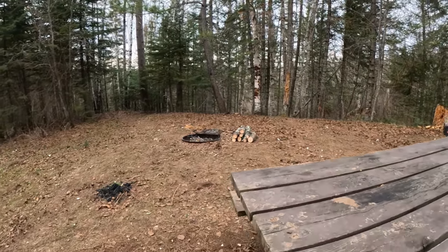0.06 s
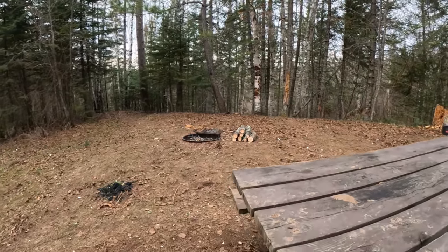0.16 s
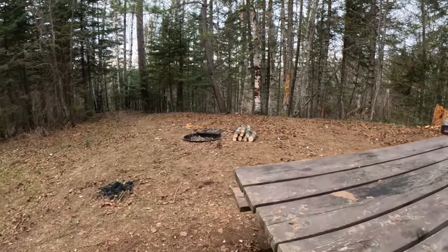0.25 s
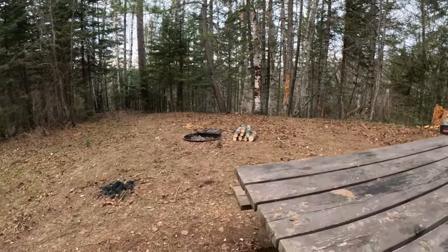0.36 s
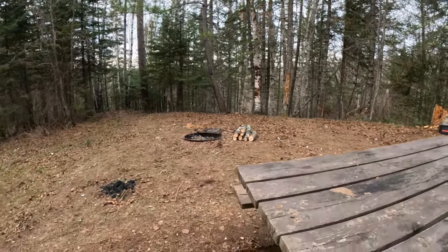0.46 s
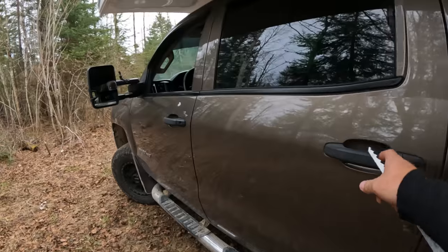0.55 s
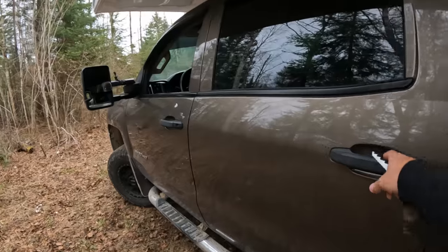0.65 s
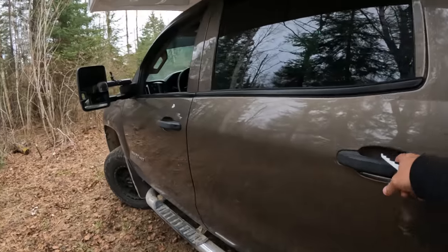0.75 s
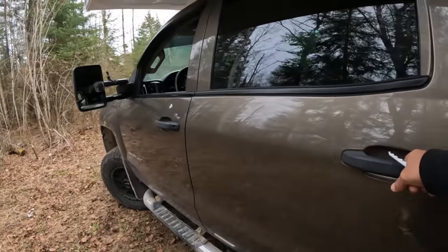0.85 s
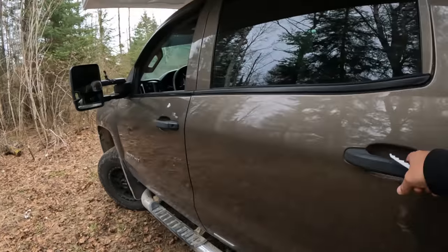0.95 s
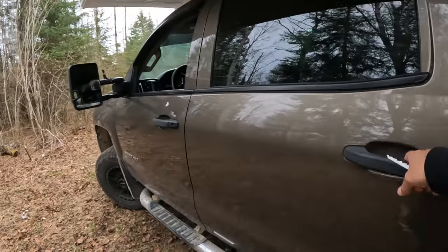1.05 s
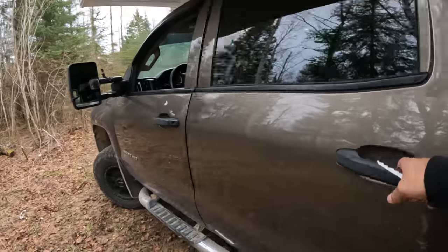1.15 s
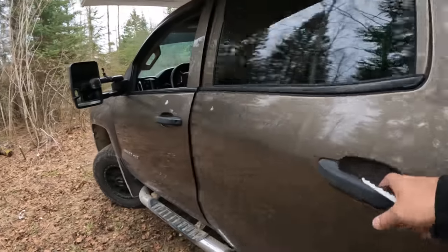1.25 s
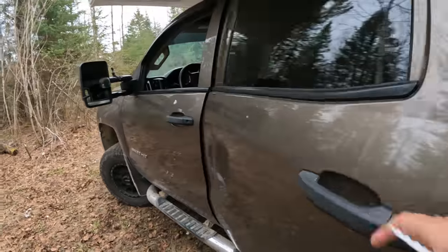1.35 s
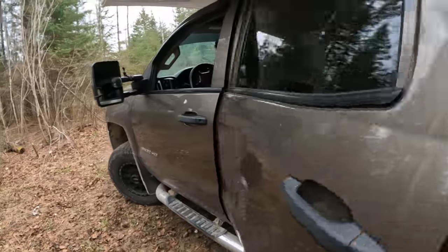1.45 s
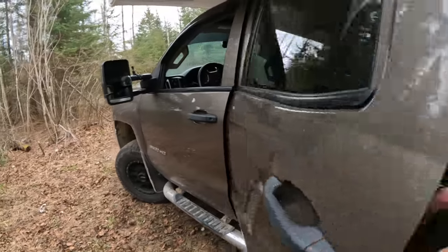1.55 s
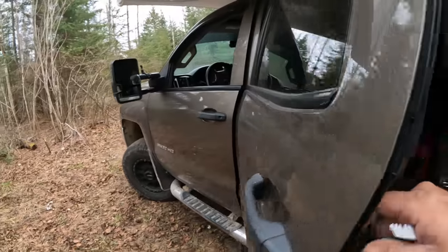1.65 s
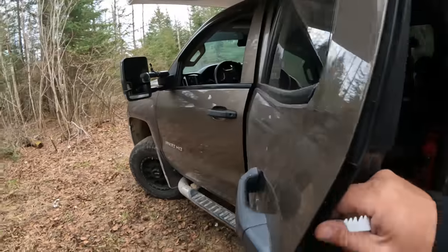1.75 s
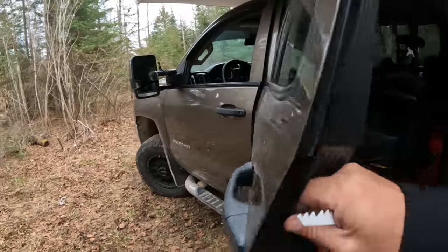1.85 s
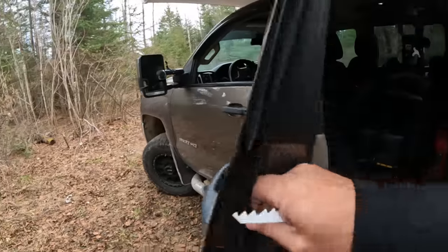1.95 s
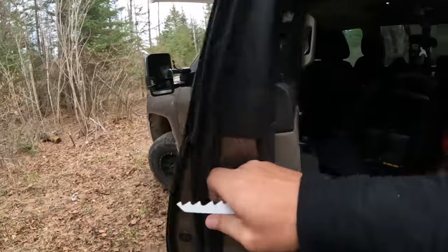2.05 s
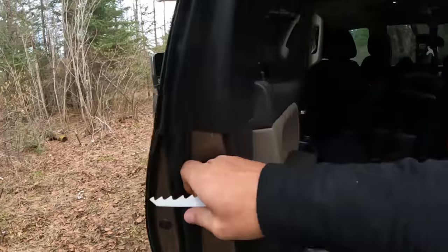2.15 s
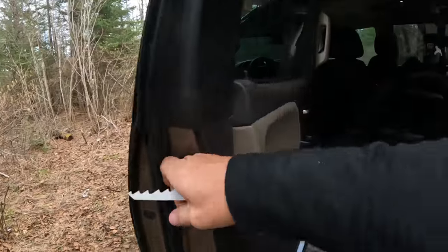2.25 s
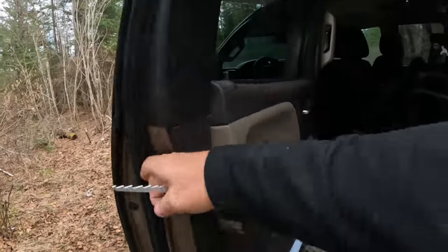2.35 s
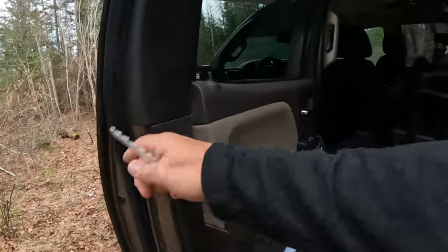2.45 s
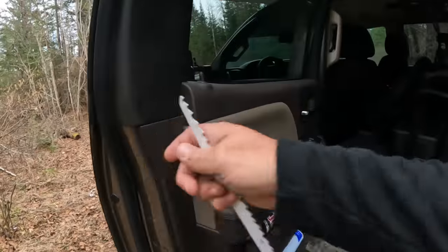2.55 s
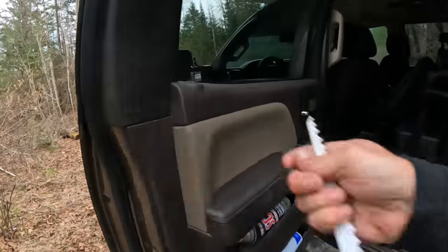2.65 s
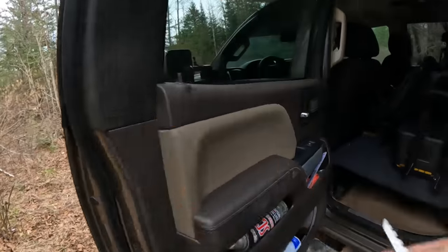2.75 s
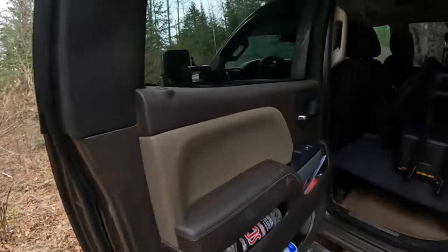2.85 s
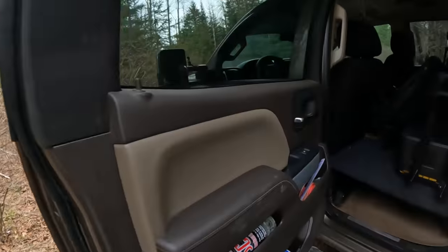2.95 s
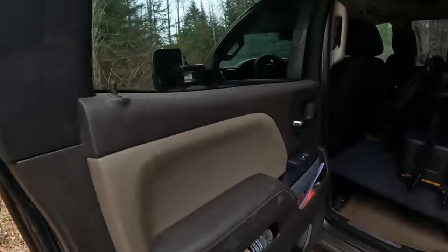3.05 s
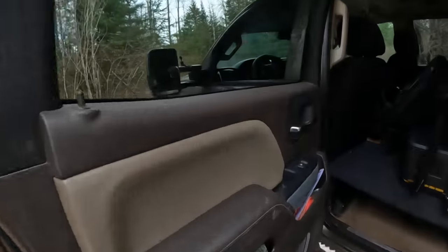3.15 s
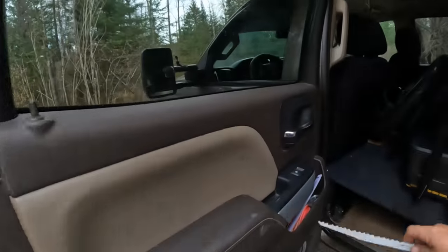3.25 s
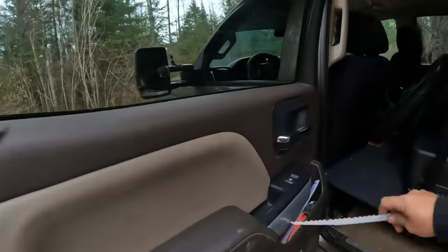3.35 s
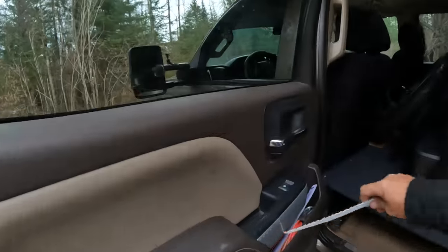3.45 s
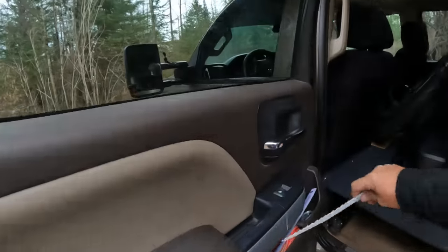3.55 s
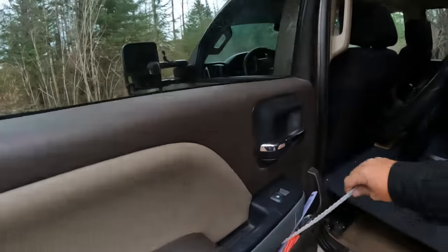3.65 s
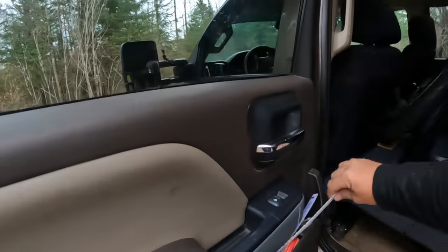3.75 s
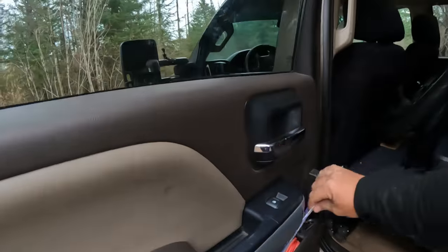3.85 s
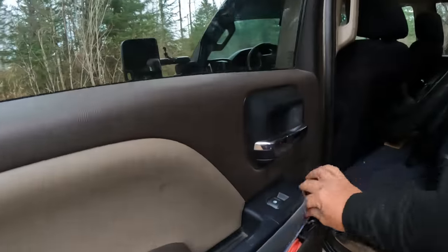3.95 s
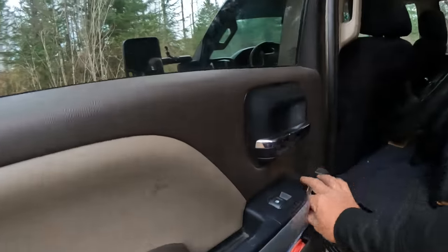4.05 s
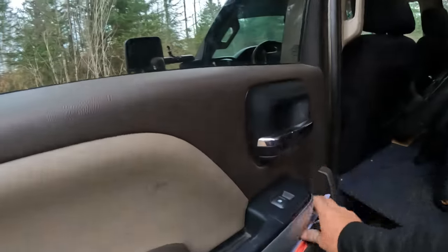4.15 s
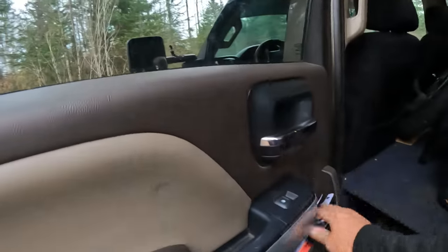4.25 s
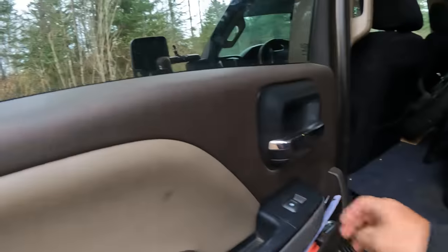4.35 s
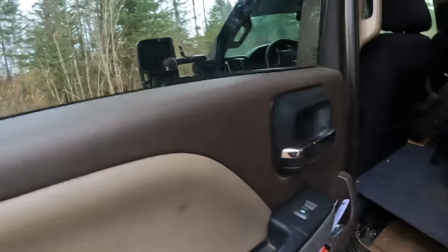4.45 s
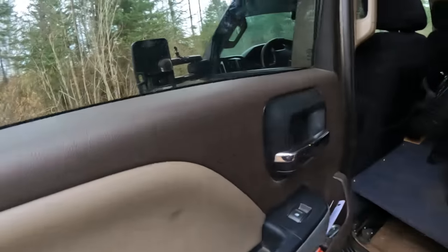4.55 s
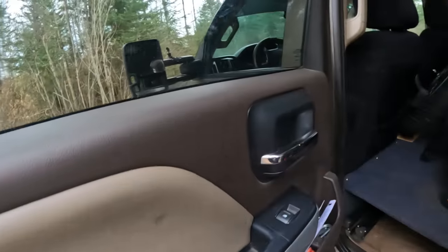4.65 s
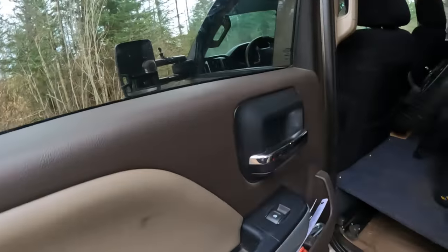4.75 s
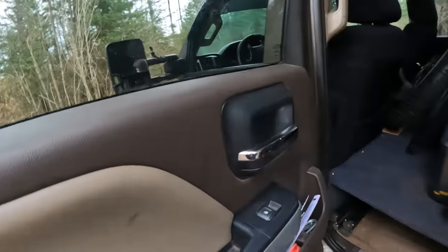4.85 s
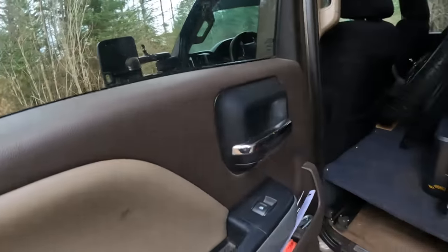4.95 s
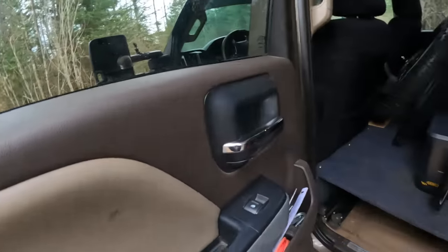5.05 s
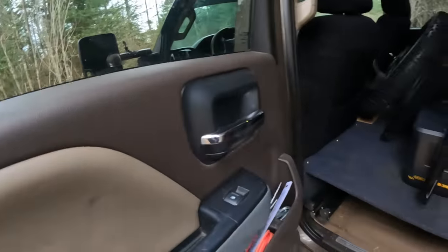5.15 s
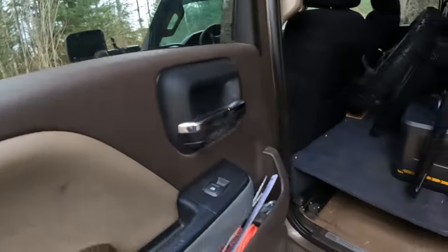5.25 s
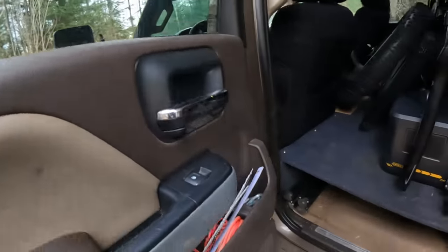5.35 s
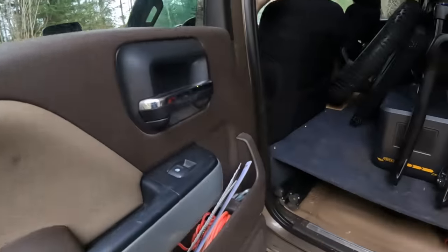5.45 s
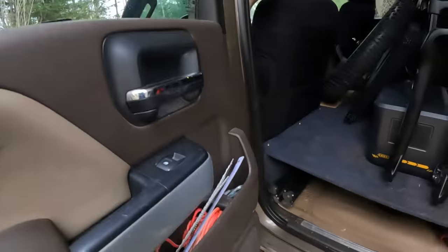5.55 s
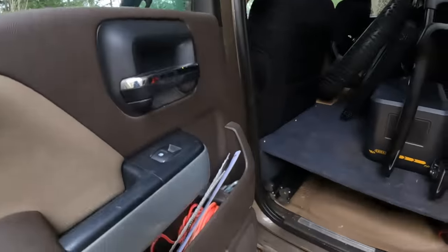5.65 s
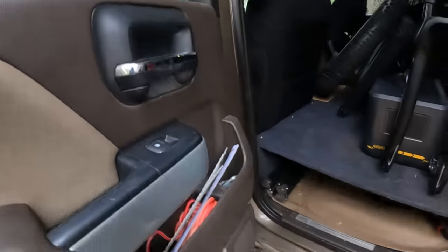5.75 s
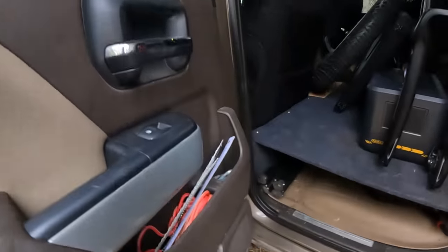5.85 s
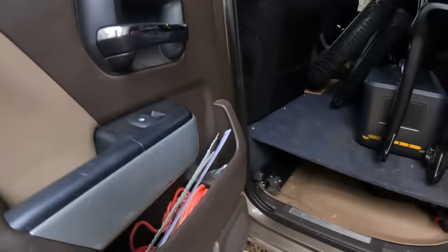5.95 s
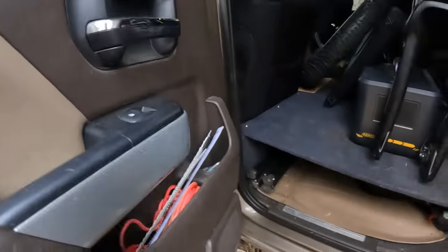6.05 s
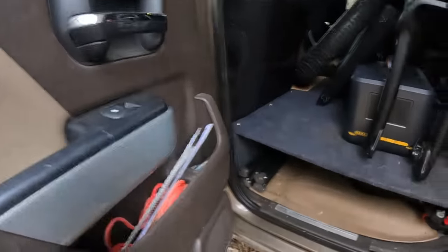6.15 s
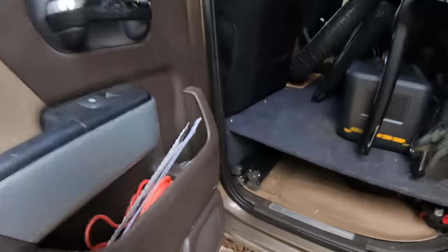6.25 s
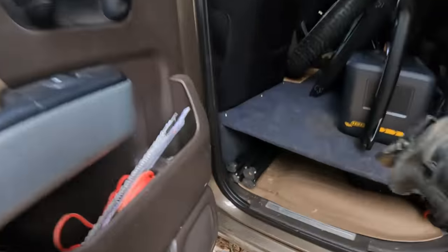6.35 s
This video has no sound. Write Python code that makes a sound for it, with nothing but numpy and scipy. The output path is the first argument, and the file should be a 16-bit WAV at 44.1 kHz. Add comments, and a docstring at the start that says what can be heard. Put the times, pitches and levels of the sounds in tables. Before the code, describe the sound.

At a quiet woodland spot a truck door handle clicks, the latch clunks open loudly, then a saw blade clinks and rattles into a plastic door pocket.

```python
"""At a quiet forest campsite a pickup's rear door is opened: the handle clicks, the latch lets go with a clunk.
A saw blade slides through the fingers, clinks and rattles down into the plastic door pocket.
Then a sleeve rustles close by and a hand knocks and rubs on the camera.
Door, pocket and housing are struck resonators, the blade is a sum of modes set off by contact or friction,
and rustle, breeze and rumble are shaped noise."""
import sys
import numpy as np
from scipy import signal
from scipy.fft import rfft, irfft, next_fast_len
from scipy.io import wavfile
from scipy.ndimage import uniform_filter1d, map_coordinates

SR = 44100
rng = np.random.default_rng(int(sys.argv[2]) if len(sys.argv) > 2 else 0)


def wav_out(sig):
    """Save sig, one row per channel (or a flat mono array), as 16-bit PCM at SR to the path in sys.argv[1]."""
    wavfile.write(sys.argv[1], SR, np.round(np.clip(np.atleast_2d(sig).T, -1, 1) * 32767).astype(np.int16))


N = 282240

# Wind in the trees. Each row: time in seconds, level in dB.
BREEZE_LEVEL = [(0, -59), (.9, -63), (1.4, -55.5), (2.7, -65), (4.5, -63.5), (5.3, -53.5), (6.4, -64)]
# Colour of that wind. Each row: frequency in Hz, relative density in dB per Hz.
TREE_SPECTRUM = [(30, -24.5), (70, -9), (180, -3), (380, 1), (750, -2.5), (1400, -7.5), (2800, -16),
                 (5000, -22.5), (7500, -36), (10000, -34), (14000, -27)]
# Swells of low rumble: the first sets in abruptly, the later ones come from sways of the carried camera.
# Each row: time of the peak in seconds, level in dB, rise in seconds, fall in seconds.
RUMBLE_SWELLS = [(.56, -51.5, 0.0087, 0.45), (1.1, -41, 0.1, 0.37), (1.41, -42.5, 0.056, 0.3),
                 (2.1, -58.5, 1.4, 1.3), (2.92, -47, 0.21, 0.53), (3.6, -56.5, 1.1, 1.0),
                 (4.8, -47.5, 0.15, 1.67), (5.68, -44, 0.11, 0.16)]
# Colour of the rumble. Each row: frequency in Hz, relative density in dB per Hz.
RUMBLE_SPECTRUM = [(15, 6), (35, -12.5), (70, -13.5), (150, -19.5), (400, -54)]
RUMBLE_REST_DB = -69

# Swells of soft rustle: the first sets in abruptly, the later ones are arm movements that brush the sleeve.
# Each row: time of the peak in seconds, level in dB, rise in seconds, fall in seconds.
RUSTLE_SWELLS = [(.56, -56, 0.005, 0.34), (1.35, -61, 0.62, 0.25), (1.74, -58, 0.21, 0.14),
                 (2.98, -59, 0.99, 1), (4.54, -62, 0.24, 0.537), (4.767, -45, .009, 0.053),
                 (4.812, -42, 0.045, .06), (4.87, -48.5, 0.16, 0.88), (5.15, -43, 0.12, 0.15),
                 (5.295, -44.5, 0.07, 0.043), (5.335, -40.5, 0.12, 0.043), (5.455, -45.5, 0.048, 0.047),
                 (5.57, -46, 0.095, 0.16), (5.73, -39, 0.068, 0.015), (5.87, -46.5, 0.02, 0.026),
                 (6.06, -43.5, 0.22, 0.17), (6.25, -58, 0.26, 1)]
# Colour of the rustle. Each row: frequency in Hz, relative density in dB per Hz.
CLOTH_SPECTRUM = [(150, -23.5), (400, -7.5), (900, -3.5), (2200, -0.5), (3600, -2), (5500, -6),
                  (7500, -17.5), (10500, -11), (14000, -8), (16000, -15.5)]
RUSTLE_REST_DB = -70  # the cloth never lies quite still
SWELL_DB = 20  # change of level within one rise or fall time

# Blows on the door: the handle clicks and thuds (1.0 s), the latch lets go (1.4 s), then hand and blade
# tap the open door. Each row: start in seconds, level in dB, lowest and highest driven frequency in Hz.
DOOR_BLOWS = [(.848, -52.5, 3140, 5200), (0.9761, -29, 580, 1600), (.992, -38, 230, 330),
              (1.025, -40.5, 249, 600), (1.046, -34.5, 600, 2200), (1.070, -24, 54.5, 650),
              (1.079, -17.5, 232, 1100), (1.085, -27.5, 1200, 1900), (1.098, -23, 80, 610),
              (1.138, -36.5, 70, 600), (1.393, -6, 1400, 2900), (1.396, -9.5, 213, 500),
              (1.406, -18, 145, 800), (1.410, -16, 1420, 2000), (1.64, -36, 1160, 1260),
              (1.818, -34, 354, 1650), (1.871, -44, 400, 1400), (2.422, -38.5, 110.2, 1500),
              (2.4806, -39.5, 201, 950), (2.655, -49, 453, 900), (2.862, -46.5, 50.9, 152),
              (3.065, -39, 520, 1100), (3.439, -25, 100, 1300), (3.503, -41, 200, 2470),
              (3.526, -43, 1890, 4100), (3.912, -31.5, 317, 2780), (3.933, -35, 320, 2600),
              (3.952, -32.5, 310, 2630), (3.964, -30, 276, 2470)]
# Panel modes of the door. Each row: frequency in Hz, relative level in dB, undamped t60 in seconds.
DOOR_MODES = [(80, -7.5, 0.4), (148.5, 0.5, 0.2), (210.5, 3.5, .21), (266, 7.5, 0.12), (343, 5, 0.11),
              (493, -1, 0.07), (769.5, -1.5, 0.063), (1404, -1, 0.04), (1630, -6, 0.037),
              (1700, -2.5, 0.044), (2043, -4.5, 0.046), (2400, -16, 0.12), (3320, -6, 0.063)]
# Dense ring of trim and lock parts. Each row: frequency in Hz, relative density in dB per Hz,
# undamped t60 in seconds.
TRIM_RING = [(60, -2, 0.44), (204, -1.5, 0.22), (375, 8.5, 0.13), (820, 2.5, 0.11), (1100, -3.5, 0.038),
             (1645, -2, 0.026), (2206, -7, 0.08), (2650, -12, 0.023), (3380, -6.5, 0.05),
             (7000, -18.5, 0.094), (11050, -7, 0.043), (15000, -12, 0.027)]
LATCH_OPENS_S, SEAL_DAMPING_DB_PER_S = 1.3, 254  # until then the rubber seals damp the shut door
TICK_GROWS = 2.1  # dB that the tick gains on the ring for each dB of the blow

# The blade slides through the fingers, then its teeth run twice along the pocket.
# Each row: start in seconds, length in seconds, level of its song in dB.
BLADE_SLIDES = [(2.845, .2, -53.5), (4.12, .065, -33.5), (4.237, 0.1, -46)]
SLIDE_ATTACK_S, SLIDE_RELEASE_DB_PER_S = 0.011, 525
# Steel contacts of the blade. Each row: start in seconds, level in dB, most favoured frequency in Hz.
BLADE_CONTACTS = [(4.046, -33, 11100), (4.118, -28, 12600), (4.132, -24, 12510), (4.142, -24.5, 10180),
                  (4.162, -29.5, 11100), (4.173, -22.5, 14360), (4.290, -33, 14760), (4.327, -44, 14000)]
# Modes of the blade. Each row: frequency in Hz, relative level in dB.
BLADE_MODES = [(2304, -7.5), (3591, -7), (3786, -10), (4230, -24), (5389, -12), (5819, -9), (6207, -10.5),
               (6638, -13.5), (7127, -15.5), (7617, -16.5), (8629, -9), (9308, -12), (9690, -8),
               (10104, -2.5), (10770, -3), (11105, -3.5), (11830, -10.5), (12250, -7), (12742, -3.5),
               (12910, 4), (13394, -1), (14070, -2), (14212, 3.5), (14550, 2), (15348, -1)]
# Typical decay: the high modes die first. Each row: frequency in Hz, t60 in seconds.
BLADE_DECAY = [(2300, 0.31), (9000, 0.26), (15000, .18)]
# Scrape of the teeth. Each row: frequency in Hz, relative density in dB per Hz.
TEETH_SPECTRUM = [(1000, -40), (2000, -20), (4000, -3.5), (7000, -13), (10500, -5), (15000, -0.5)]
BLADE_REST_S, BLADE_DAMPING_DB_PER_S = 4.345, 353.5  # the blade comes to rest and the pocket damps it

# Blows of the blade on the rim and walls of the pocket. Each row: start in seconds, level in dB,
# lowest and highest driven frequency in Hz.
POCKET_BLOWS = [(3.437, -22.5, 995, 11990), (4.049, -35, 349, 1197), (4.066, -31.5, 350, 468),
                (4.083, -29, 346, 480), (4.1195, -13.5, 334, 1760), (4.138, -18, 1170, 3800),
                (4.142, -19, 1000, 3400), (4.148, -18, 376, 1110), (4.159, -18, 480, 4600),
                (4.186, -17, 388, 1150), (4.2275, -17, 405, 1020), (4.247, -25, 480, 1390),
                (4.259, -27, 660, 2000), (4.307, -33.5, 400, 1000), (4.331, -38.5, 402, 994)]
# Modes of the pocket. Each row: frequency in Hz, relative level in dB, t60 in seconds.
POCKET_MODES = [(396, -7, 0.048), (478, -3, 0.074), (578, -12, 0.05), (793, -1.5, 0.027),
                (1000, -14, 0.033), (1497, -9.5, 0.02), (1905, -13.5, 0.051), (3770, -27, 0.036)]
# Dense ring of its wall. Each row: frequency in Hz, relative density in dB per Hz, t60 in seconds.
POCKET_WALL_RING = [(120, 1, 0.23), (480, 7, 0.056), (935, -2, 0.081), (2510, -6.5, 0.052),
                    (6880, -22, 0.046), (15000, -15, 0.046)]

# Knocks on the camera housing. Each row: start in seconds, level in dB,
# lowest and highest driven frequency in Hz.
CAMERA_KNOCKS = [(4.954, -35.5, 640, 1890), (4.984, -33.5, 2080, 2390), (5.254, -41, 2150, 2920),
                 (5.5675, -18, 172, 880), (5.587, -33, 293, 885), (5.677, -38.5, 2000, 8920),
                 (5.7555, -9, 147, 1118), (5.7655, -27.5, 100, 1000), (5.766, -42, 5000, 10900)]
# Modes of the housing. Each row: frequency in Hz, relative level in dB, t60 in seconds.
HOUSING_MODES = [(284, -5.5, 0.029), (471, -8, 0.026), (587, 0.5, 0.015), (956, -1.5, 0.033),
                 (1247, -3, 0.024), (1927, 4, 0.0081)]
# Dense ring of its shell. Each row: frequency in Hz, relative density in dB per Hz, t60 in seconds.
SHELL_RING = [(81.2, 16.5, 0.017), (513, 12, 0.025), (1500, -31, 0.018), (3000, -3, 0.07),
              (6620, -9.5, 0.061), (14070, -1.5, 0.0057)]
# Colour of the finger's drag. Each row: frequency in Hz, relative density in dB per Hz.
RUB_SPECTRUM = [(60, -15), (160, -26.5), (290, -5), (415, -4), (600, -5), (780, -6), (960, 2.5),
                (1120, -11), (1900, -17.5), (2800, -35), (4800, -26), (7500, -52), (11000, -40),
                (15000, -39.5)]
# The skin snags on the housing. Each row: frequency in Hz, relative density in dB per Hz.
SNAG_SPECTRUM = [(600, -11), (4000, -1), (15000, -2.5)]
# the finger's drag builds with pressure, holds and lets go
RUB_START_S, RUB_LENGTH_S, RUB_DB = 5.595, .14, -28.5
RUB_ATTACK_S, RUB_RELEASE_DB_PER_S = 0.09, 1405
# its hiss climbs as the finger gathers speed
RUB_HISS_HZ, RUB_HISS_OCTAVES_PER_S, RUB_HISS_WIDTH_HZ = 632, 20, 700

# Echo of cab and trees. Each row: frequency in Hz, relative density in dB per Hz, t60 in seconds.
CAB_ECHO = [(100, -2, 0.14), (499, -0.5, 0.22), (1800, -3.5, 0.24), (5000, -11.5, 0.23),
            (15000, -16.5, 0.15)]
# Response with the notch of the microphone port. Each row: frequency in Hz, gain in dB.
PORT_RESPONSE = [(20, 6), (6500, -3.5), (7900, -5), (8300, -18), (8750, -6), (10000, 0)]
TOP_HZ = 15900  # upper end of the band


def amp(db):
    """Logarithmic level: decibels to gain."""
    return 10 ** (np.asarray(db) / 20)


def unit(x):
    """Normalisation: x at rms 1."""
    return x / np.sqrt(np.mean(x ** 2) + 1e-20)


def along(points, hz):
    """Interpolation in pitch: (Hz, value) points read on a log axis."""
    f, v = np.transpose(points)
    return np.interp(np.log(hz + 1), np.log(f + 1), v)


def level(rows):
    """Amplitude envelope: gain per sample from (s, dB) rows, silent outside them."""
    s, db = np.transpose(rows)
    return amp(np.interp(np.arange(N) / SR, s, db, left=-120, right=-120))


def wobble(rate):
    """Slow random modulation: a smooth curve with rate knots a second."""
    return map_coordinates(rng.standard_normal(int(N * rate / SR) + 4), [np.arange(N) * rate / SR])


def swells(rows, rest_db):
    """Addition of powers: swells change by SWELL_DB in their rise and fall times, over a steady rest."""
    t, power = np.arange(0, N, 32) / SR, amp(rest_db) ** 2
    for s, db, rise_s, fall_s in rows:
        away = np.maximum((s - t) / rise_s, (t - s) / fall_s)
        power = power + amp(db - SWELL_DB * away) ** 2
    return np.interp(np.arange(N) / SR, t, np.sqrt(power))


def stroke(start_s, length_s, db, attack_s, release_db_per_s):
    """Envelope of one sliding contact: linear attack, hold, exponential release."""
    t = np.arange(N) / SR - start_s
    release_db = release_db_per_s * np.maximum(t - length_s, 0)
    return np.clip(t / attack_s, 0, 1) * amp(db - release_db)


def filtered(x, response):
    """Linear filtering: the spectrum of x times a response of frequency."""
    m = next_fast_len(len(x) + SR // 4)
    return irfft(rfft(x, m) * response(np.fft.rfftfreq(m, 1 / SR)), m)[:len(x)]


def coloured(x, spectrum):
    """Spectral shaping: x shaped by a (Hz, dB) spectrum, at rms 1."""
    return unit(filtered(x, lambda hz: amp(along(spectrum, hz))))


def friction(slips_per_s, smooth_db):
    """Stick-slip friction: tiny slips of random size over a smooth hiss."""
    slips = rng.standard_normal(N) * (rng.random(N) < slips_per_s / SR)
    return unit(slips) + amp(smooth_db) * rng.standard_normal(N)


def dense_ring(bands, count=1):
    """High modal density: countless close modes act as noise whose bands die at their own speeds."""
    t, hz = np.arange(SR // 2) / SR, np.fft.rfftfreq(SR // 2, 1 / SR)
    noise = rfft(rng.standard_normal((count, len(t))).astype(np.float32))
    centres = [row[0] for row in bands]
    out = np.zeros((count, len(t)), np.float32)
    # each band's share is 1 at its own centre and 0 at the others
    for share, (_, db, t60) in zip(np.eye(len(bands)), bands):
        band = along(list(zip(centres, share)), hz).astype(np.float32)
        decay = amp(db - 60 * t / t60).astype(np.float32)
        out += decay * irfft(noise * band, len(t))
    return [unit(ring.astype(float)) for ring in out]


def add(track, s, sound, db):
    """Superposition: lay a sound in at time s, its loudest 8 milliseconds at db."""
    loudest = np.sqrt(uniform_filter1d(sound ** 2, size=353).max())
    part = track[round(s * SR):][:len(sound)]
    part += amp(db) / loudest * sound[:len(part)]


def struck(hits, modes, bands, dense_db, crack_db, tick_db, contact_s, vary_db=0, damping=0):
    """Impact excitation: hard contacts reach high, light ones leave the bass still; damping in dB per s."""
    track, t = np.zeros(N), np.arange(SR // 2) / SR
    hz, mode_db, t60 = np.transpose(modes)[:, :, None]
    sign = (-1) ** np.arange(len(modes))[:, None]
    shapes = sign * amp(mode_db - 60 * t / t60) * np.sin(2 * np.pi * hz * t)
    contact = np.exp(-t / contact_s)
    dense_rings = dense_ring(bands, count=len(hits))
    losses = np.broadcast_to(damping, len(hits))
    for (s, db, low_hz, high_hz), dense, loss in zip(hits, dense_rings, losses):
        strengths = amp(vary_db * rng.standard_normal(len(modes)))
        ring = unit(strengths @ shapes) + amp(dense_db) * dense
        # the direct crack of the contact
        ring = ring + amp(crack_db) * unit(dense * contact)
        # a soft contact takes longer to build up its force
        ring = ring * (1 - np.exp(-t * high_hz / 0.41)) * amp(-loss * t)
        for edge, kind in ((low_hz, "high"), (high_hz, "low")):
            b, a = signal.butter(2, min(edge, SR / 2 - 1), kind, fs=SR)
            ring = signal.lfilter(b, a, ring)
        # a fine bright tick stands out on the strongest blows
        bright = coloured(rng.standard_normal(len(t)), [(6000, -15.0), (11000, -4.0)])
        tick = unit(contact * bright)
        add(track, s, unit(ring) + amp(tick_db + TICK_GROWS * db) * tick, db)
    return track


def outdoors():
    """Broadband noise: a light breeze in the trees and a low rumble that swells and fades."""
    breeze = coloured(rng.standard_normal(N), TREE_SPECTRUM) * level(BREEZE_LEVEL) * amp(0.6 * wobble(1.6))
    rumble = coloured(rng.standard_normal(N), RUMBLE_SPECTRUM) * swells(RUMBLE_SWELLS, RUMBLE_REST_DB)
    return breeze + rumble


def rustle(patchy_db=2.6, flutter_db=1.26, crackle_db=-9):
    """Friction noise as of cloth on cloth: shifting folds change its colour and creases crackle."""
    z = signal.stft(friction(slips_per_s=2700, smooth_db=5.0), nperseg=512)[2]
    # smoothed over frequency, then over time
    folds = uniform_filter1d(rng.standard_normal(z.shape), size=12, axis=0)
    folds = uniform_filter1d(folds, size=7, axis=1)
    brush = signal.istft(z * amp(patchy_db * unit(folds)), nperseg=512)[1][:N]
    creases = friction(slips_per_s=110, smooth_db=-29.0)
    cloth = unit(brush) * amp(flutter_db * wobble(76)) + amp(crackle_db) * creases
    return coloured(cloth, CLOTH_SPECTRUM) * swells(RUSTLE_SWELLS, RUSTLE_REST_DB)


def door():
    """Shared resonator: handle, latch, hinge stop and light taps all sound through the same panel."""
    seals = [SEAL_DAMPING_DB_PER_S * (s < LATCH_OPENS_S) for s, *_ in DOOR_BLOWS]
    return struck(DOOR_BLOWS, DOOR_MODES, TRIM_RING, dense_db=2.0, crack_db=-1.0, tick_db=-5.5,
                  contact_s=.0025, damping=seals)


def echo(x):
    """Reverberation by convolution: the short answer of the cab and the trees."""
    tail, = dense_ring(CAB_ECHO)
    return signal.fftconvolve(x, tail / np.linalg.norm(tail))[:N]


def blade(width_hz=35, teeth_db=-4, wall_db=-7):
    """Friction-driven resonance: the sliding blade sings; in the pocket its teeth hiss and buzz the wall."""
    hz, mode_db = np.transpose(BLADE_MODES)[:, :, None]

    def steel(f):
        """Resonance curves: the summed response of all blade modes."""
        loss = 1j * f * width_hz
        return np.sum(amp(mode_db) * loss / (hz ** 2 - f ** 2 + loss), axis=0)

    # the teeth catch and let go
    drag = friction(slips_per_s=1200, smooth_db=-3.0) * amp(3.7 * wobble(70))
    in_hand, *pocket_strokes = [stroke(s, length_s, db, SLIDE_ATTACK_S, SLIDE_RELEASE_DB_PER_S)
                                for s, length_s, db in BLADE_SLIDES]
    in_pocket = sum(pocket_strokes)
    sliding = in_hand + in_pocket
    song = unit(filtered(drag, steel))
    hiss = amp(teeth_db) * coloured(drag, TEETH_SPECTRUM)
    buzz = amp(wall_db) * coloured(drag, [(f, db) for f, db, _ in POCKET_WALL_RING])
    return clinks(sliding) + song * sliding + (hiss + buzz) * in_pocket


def clinks(sliding, scrape_db=-10, scrape_t60=0.12, vary_db=4.0, focus_db=5, focus_width_hz=1500,
           blur_hz=55, free_blur_hz=3, choke_db=-4, life_scatter=.45):
    """Modal ringing of thin steel: every contact checks the old ring and starts a different one."""
    track, t = np.zeros(N), np.arange(SR // 2) / SR
    hz, mode_db = np.transpose(BLADE_MODES)[:, :, None]
    for s, db, bright_hz in BLADE_CONTACTS:
        start = round(s * SR)
        strength, phase, life = rng.standard_normal((3, len(hz), 1))
        # where the blade leans, some modes are damped and others ring on
        t60 = along(BLADE_DECAY, hz) * np.exp(life_scatter * life)
        # each point of contact favours the modes around one frequency
        focus = np.exp(-((hz - bright_hz) / focus_width_hz) ** 2)
        start_db = mode_db + vary_db * strength + focus_db * focus
        # chattering against the plastic blurs each mode while the blade slides: its phase, in cycles, drifts
        chatter_hz = free_blur_hz + blur_hz * sliding[start:][:len(t)] / sliding.max()
        drift = rng.standard_normal((len(hz), len(t))) * np.sqrt(chatter_hz / (2 * np.pi * SR))
        phase = phase + np.cumsum(drift, axis=1)
        ring = np.sum(amp(start_db - 60 * t / t60) * np.sin(2 * np.pi * (hz * t + phase)), axis=0)
        # a short scrape of the teeth starts it
        fade = amp(scrape_db) * unit(amp(-60 * t / scrape_t60))
        scrape = fade * coloured(rng.standard_normal(len(t)), TEETH_SPECTRUM)
        track[start:] *= amp(choke_db)
        add(track, s, unit(ring) + scrape, db)
    resting_s = np.maximum(np.arange(N) / SR - BLADE_REST_S, 0)
    return track * amp(-BLADE_DAMPING_DB_PER_S * resting_s)


def pocket():
    """Impacts on a hollow body: the blade bounces down the plastic pocket."""
    return struck(POCKET_BLOWS, POCKET_MODES, POCKET_WALL_RING, dense_db=-1, crack_db=-14.0, tick_db=-19,
                  contact_s=0.0018, vary_db=2.0)


def grip(judder_db=1.8, snag_db=-31, hiss_db=-18):
    """Impact and stick-slip: a hand bumps the camera, drags a juddering finger ever faster and slips off."""
    pressure = stroke(RUB_START_S, RUB_LENGTH_S, RUB_DB, RUB_ATTACK_S, RUB_RELEASE_DB_PER_S)
    rubbing = friction(slips_per_s=1300, smooth_db=-3) * amp(judder_db * wobble(260))
    drag = coloured(rubbing, RUB_SPECTRUM)
    snags = coloured(friction(slips_per_s=450, smooth_db=-14), SNAG_SPECTRUM)
    # low-passed noise is shifted up to the climbing centre frequency
    rubbed_s = np.clip(np.arange(N) / SR - RUB_START_S, 0, RUB_LENGTH_S)
    centre_hz = RUB_HISS_HZ * 2 ** (RUB_HISS_OCTAVES_PER_S * rubbed_s)
    band = filtered(rng.standard_normal(N), lambda hz: np.exp(-(hz / RUB_HISS_WIDTH_HZ) ** 2))
    hiss = unit(band * np.sin(2 * np.pi * np.cumsum(centre_hz) / SR))
    knocks = struck(CAMERA_KNOCKS, HOUSING_MODES, SHELL_RING, dense_db=-6.5, crack_db=-7.5, tick_db=-1.0,
                    contact_s=0.0013)
    return (drag + amp(snag_db) * snags + amp(hiss_db) * hiss) * pressure + knocks


def scene(door_echo_db=-23, pocket_echo_db=-28):
    """Superposition: all sources and the echo add up at the one microphone."""
    knocks, rattle = door(), pocket()
    room = echo(amp(door_echo_db) * knocks + amp(pocket_echo_db) * rattle)
    return (outdoors() + rustle() + knocks + room + blade() + rattle + grip())[None]


def record(dry):
    """Transducer limits: the port cuts a notch, peaks beyond full scale clip, the band ends steeply."""
    ported = filtered(dry[0], lambda hz: amp(along(PORT_RESPONSE, hz)))
    clipped = np.clip(ported, -1, 1)
    return filtered(clipped, lambda hz: hz < TOP_HZ)[None]


dry = scene()
out = record(dry)
wav_out(out)
```